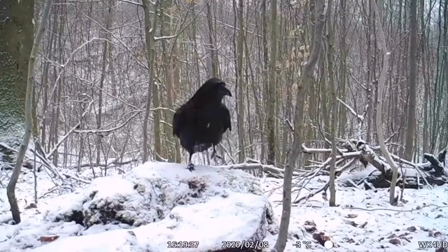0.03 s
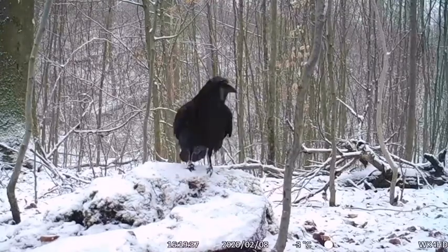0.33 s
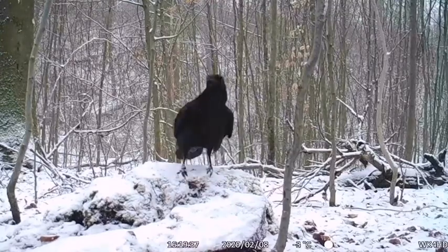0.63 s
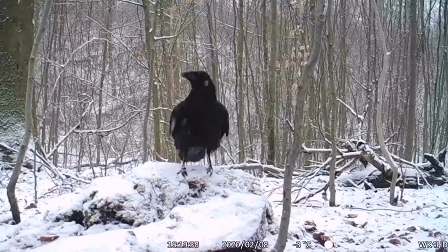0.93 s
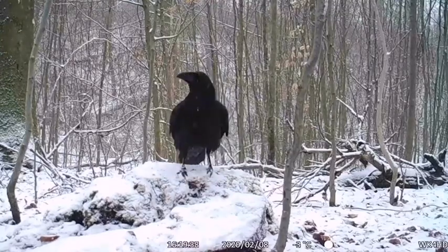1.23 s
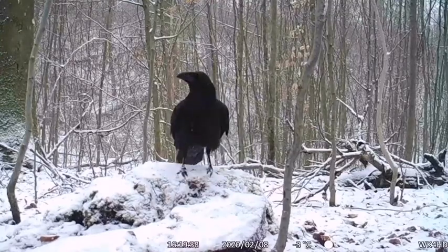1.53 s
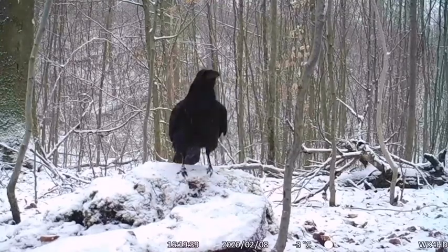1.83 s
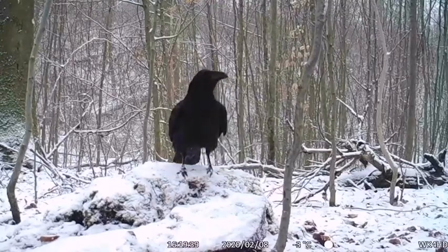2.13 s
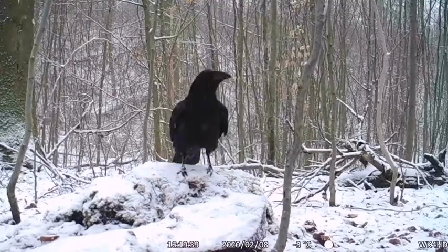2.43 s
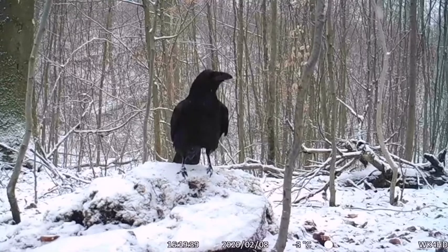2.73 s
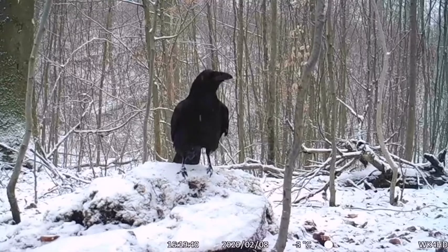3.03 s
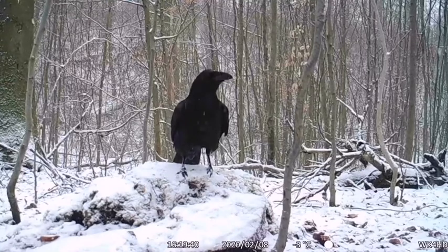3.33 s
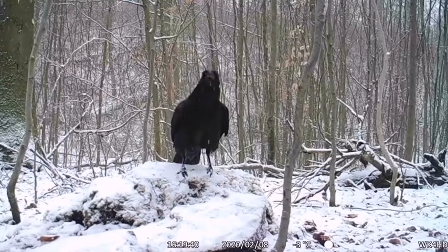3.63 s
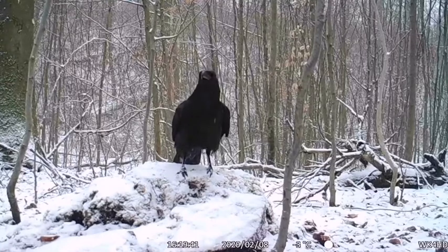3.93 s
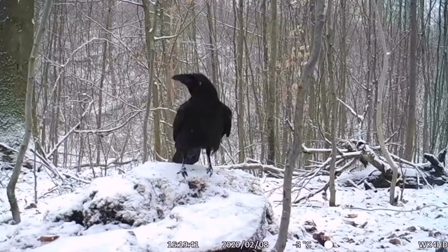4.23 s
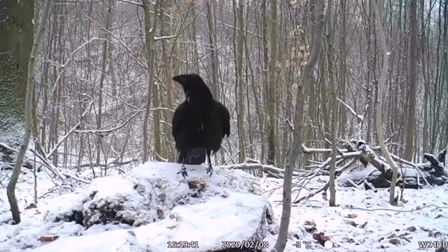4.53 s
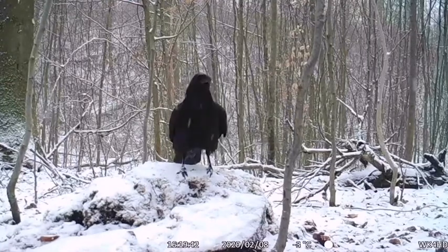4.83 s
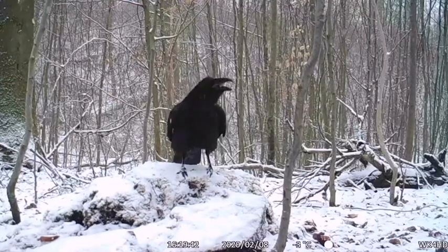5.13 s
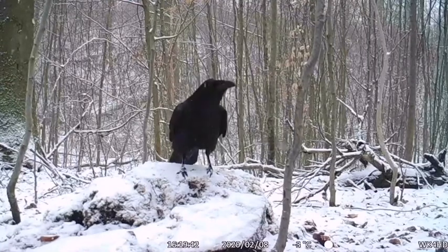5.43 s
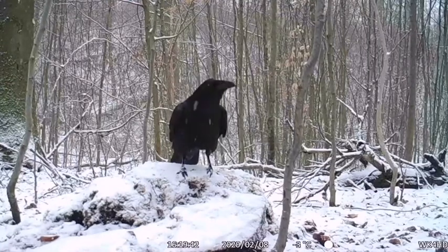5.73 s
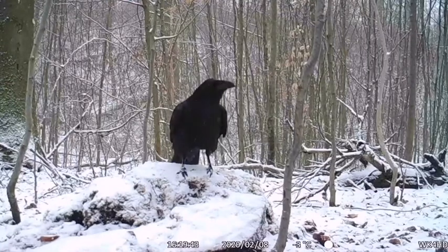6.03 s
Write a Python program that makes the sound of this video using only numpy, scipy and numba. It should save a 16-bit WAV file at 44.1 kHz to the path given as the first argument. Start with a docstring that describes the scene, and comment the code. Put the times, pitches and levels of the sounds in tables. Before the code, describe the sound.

One loud, hoarse raven croak breaks the stillness of a snowy forest near the end, after several seconds of only faint, steady rumble and hiss from far away. The call is brief and close, a throaty rattle that opens into a raspy note and drops, leaving a thin echo among the trees. The microphone has little treble and adds slight grit to the peaks.

```python
"""Raven croak in a snowy forest

One close, harsh croak: throbs of air drive the syrinx and ring throat and beak.
It starts as a rattle, swells into a rough arched note and falls.
Trunks scatter it back over a soft, distant rush.
A narrow-band microphone overloads on the loudest throbs."""
import sys
import numpy as np
from scipy import signal
from scipy.fft import rfft, irfft
from scipy.io import wavfile
from scipy.ndimage import uniform_filter1d
from numba import njit

SR = 44100
rng = np.random.default_rng(int(sys.argv[2]) if len(sys.argv) > 2 else 0)


def wav_out(sig):
    """Save sig, one row per channel (or a flat mono array), as 16-bit PCM at SR to the path in sys.argv[1]."""
    wavfile.write(sys.argv[1], SR, np.round(np.clip(np.atleast_2d(sig).T, -1, 1) * 32767).astype(np.int16))


N = 267687
TIME_S = np.arange(N) / SR
FIRST_THROB_S = 4.9847
MICROPHONE_HZ = 4077

# windpipe and throat resonances before tuning: centre_hz, width_hz, relative_db
THROAT_MODES = [(590, 250, -32), (1222, 205, 10.5), (1440, 150, -7.5), (1680, 90, -17.5)]
# open-beak resonances: centre_hz, width_hz, relative_db
BEAK_MODES = [(2300, 200, -24), (2764, 210, -0.5), (3010, 130, 2.5), (3684, 200, -3.5)]


def from_db(db):
    """Decibels to gain."""
    return 10 ** (np.asarray(db) / 20)


def unit_rms(x):
    """Scale to rms 1."""
    return x / np.sqrt(np.mean(x ** 2) + 1e-20)


def hold_rms(x, window_samples=353):
    """Hold the running rms at 1."""
    power = uniform_filter1d(uniform_filter1d(x ** 2, window_samples), window_samples)
    return x / np.sqrt(np.abs(power) + 1e-12)


def cut(x, hz, kind, order=2):
    """Butterworth low- or high-pass."""
    return signal.sosfilt(signal.butter(order, hz, kind, fs=SR, output="sos"), x)


def wander(rate_hz):
    """Smooth random drift, rms 1."""
    return unit_rms(cut(rng.standard_normal(N + SR), rate_hz, "low")[SR:])


def ramp(mid_s, width_s):
    """Smooth step from 0 to 1."""
    return .5 + .5 * np.tanh((TIME_S - mid_s) / (2 * width_s))


@njit
def ring(x, rad_per_sample, radius):
    """Two-pole resonance with a movable centre."""
    y = np.zeros(len(x))
    for i in range(2, len(x)):
        drive = (1 - radius ** 2) / 2 * (x[i] - x[i - 2])
        y[i] = drive + 2 * radius * np.cos(rad_per_sample[i]) * y[i - 1] - radius ** 2 * y[i - 2]
    return y


def resonate(x, modes, tuning=1):
    """Parallel resonances of alternating sign, centres scaled by tuning."""
    rad_per_hz = 2 * np.pi / SR * tuning * np.ones(N)
    return sum((-1) ** k * from_db(db) * ring(x, hz * rad_per_hz, np.exp(-np.pi * width_hz / SR))
               for k, (hz, width_hz, db) in enumerate(modes))


def distant_rush(level_db=-51.5, rise_db_per_s=.23, waver_db=.34, split_hz=600):
    """Far forest noise; rumble and hiss waver separately."""
    # noise spectrum: frequency_hz, relative_density_db
    rush_spectrum = [(20, 5), (55, -1.5), (80, -3.5), (160, -6.5), (255, -4), (320, -9.5), (600, -15),
                     (950, -9.5), (1300, -13.5), (1800, -23), (2500, -28), (3600, -30), (4400, -49.5)]
    hz, db = np.transpose(rush_spectrum)
    bins_hz = np.arange(N // 2 + 1) * SR / N
    shape = from_db(np.interp(np.log(bins_hz + 1), np.log(hz), db))
    noise = irfft(rfft(rng.standard_normal(N)) * shape, N)
    noise = unit_rms(cut(noise, 20, "high"))
    rumble = cut(noise, split_hz, "low", order=1)
    hiss = noise - rumble
    rush = rumble * from_db(waver_db * wander(1.7)) + hiss * from_db(waver_db * wander(3.9))
    return from_db(level_db + rise_db_per_s * TIME_S) * rush


def forest_echo(x, t60_s=1.15, build_s=.011, tail_db=-30.5, low_hz=1100, bark_hz=3200):
    """Near trunks give distinct echoes; far ones blur into a thin tail."""
    # near-trunk echoes: delay_s, level_db
    trunk_echoes = [(.037, -37.5), (.066, -30.5), (.083, -38)]
    envelope = from_db(-60 * TIME_S / t60_s) * (1 - np.exp(-TIME_S / build_s))
    scatter = rng.standard_normal(N) * envelope
    response = from_db(tail_db) * scatter / np.sqrt(np.sum(scatter ** 2))
    for delay_s, level_db in trunk_echoes:
        response[round(delay_s * SR)] += from_db(level_db)
    echo = signal.fftconvolve(x, response)[:N]
    # long waves bend around trunks; the shortest are lost in bark and snow
    return cut(cut(echo, low_hz, "high", order=1), bark_hz, "low", order=4)


def rattle_to_note(rattle, note):
    """Crossfade a setting as the throbs fuse into a note."""
    return rattle + (note - rattle) * ramp(mid_s=5.063, width_s=.004)


def throb_count(start_hz=83.9, slowing_hz_per_s=350):
    """Throbs elapsed; their rate falls linearly to zero."""
    age_s = np.clip(TIME_S - FIRST_THROB_S, 0, start_hz / slowing_hz_per_s)
    return start_hz * age_s - slowing_hz_per_s * age_s ** 2 / 2


def effort(hold_db=-6.5):
    """One push of air: swell, hold, collapse."""
    swell = ramp(mid_s=5.044, width_s=.014)
    release = 1 - ramp(mid_s=5.178, width_s=.0067)
    return from_db(hold_db) * (TIME_S > FIRST_THROB_S) * swell * release


def air_pressure(narrowness=3.5):
    """Effort with dips between throbs: deep in the rattle, shallow in the note."""
    closure = np.abs(np.cos(np.pi * throb_count())) ** narrowness
    dip_db = rattle_to_note(26, 7.5)
    return effort() * from_db(-dip_db * closure) + 1e-9


def syrinx(jitter=.035, shimmer_db=3.5, rasp=.75, bend_depth=.068, bend_lag_throbs=.18):
    """Uneven pulses with a turbulent puff per cycle; each throb bends the pitch up."""
    # arch of the note: time_s, pitch_hz
    pitch_arch = [(5.02, 290), (5.09, 364), (5.118, 410), (5.15, 405), (5.16, 333), (5.19, 228)]
    arch_hz = np.interp(TIME_S, *np.transpose(pitch_arch))
    hoarseness = rattle_to_note(.6, .5)
    bend = -bend_depth * np.cos(2 * np.pi * (throb_count() - bend_lag_throbs))
    pitch_hz = arch_hz * (1 + bend + jitter * hoarseness * wander(220))
    cycles = np.cumsum(pitch_hz) / SR
    pulses = unit_rms(sum(np.cos(2 * np.pi * k * cycles) for k in range(1, 19)))
    turbulence = cut(rng.standard_normal(N), 9000, "low")
    puffs = hoarseness * unit_rms(turbulence * (1 + np.cos(2 * np.pi * cycles)))
    shimmer = from_db(shimmer_db * hoarseness * wander(200))
    return pulses * shimmer + rasp * puffs, puffs, cycles


def chest(pressure, cycles, level_db=-22, knee_db=-21, waver_db=2.4, octave_db=-14, slip_cycles=.056):
    """The two lowest partials waver in level and phase and saturate early with pressure."""
    phase = 2 * np.pi * (cycles + slip_cycles * wander(170))
    partials = np.sin(phase) + from_db(octave_db + waver_db * wander(130)) * np.sin(2 * phase)
    saturation = pressure / (pressure + from_db(knee_db))
    return from_db(level_db + waver_db * wander(100)) * saturation * np.sqrt(2) * partials


def snaps(open_phase_throbs=.38, ring_db=9, crack_db=-5):
    """Membranes snap open once a throb; the crack also rings throat and beak."""
    opens = np.diff(np.floor(throb_count() - open_phase_throbs), prepend=-1) > 0
    strength = effort() ** 1.1 * from_db(rattle_to_note(-.5, -4))
    clicks = 1e-18 * rng.standard_normal(N) - opens * strength
    band_makeup = SR / (2 * MICROPHONE_HZ)
    crack = from_db(crack_db) * cut(clicks, 600, "high") * band_makeup
    return crack + from_db(ring_db) * (resonate(clicks, THROAT_MODES) + resonate(clicks, BEAK_MODES))


def raven(throat_db=1, beak_db=-5, beak_rasp=.92, cavity_hz=1640, cavity_width_hz=110):
    """Throbbing air sounds the syrinx through throat and beak; strong throbs are brighter."""
    pressure = air_pressure()
    source, puffs, cycles = syrinx()
    # each throb stretches the throat and lifts its resonances
    tuning = .91 + .14 * pressure / pressure.max()
    throat = resonate(source, THROAT_MODES, tuning)
    throat = hold_rms(cut(cut(throat, 850, "high"), 1850, "low", order=4))
    beak = resonate(source + beak_rasp * puffs, BEAK_MODES)
    beak = hold_rms(cut(beak, 2200, "high"))
    voice = from_db(throat_db) * pressure * throat + from_db(beak_db) * pressure ** 1.4 * beak + snaps()
    # a side cavity of the mouth absorbs one narrow band
    notch = signal.iirnotch(cavity_hz, cavity_hz / cavity_width_hz, SR)
    return signal.lfilter(*notch, voice) + chest(pressure, cycles)


def scene():
    """Croak, echo and rush, alike in both channels."""
    croak = raven()
    return np.tile(croak + forest_echo(croak) + distant_rush(), (2, 1))


def record(dry, overload=.74, sizzle_knee=.33, sizzle_db=-23.5, sizzle_hz=8200, cutoff_hz=12900):
    """The microphone flattens peaks and narrows the band; faint sizzle rides the highest crests."""
    clipped = dry / (1 + (dry / overload) ** 6) ** (1 / 6)
    narrow = signal.sosfiltfilt(signal.cheby1(7, .05, MICROPHONE_HZ, fs=SR, output="sos"), clipped)
    crests = np.maximum(np.abs(clipped) / overload - sizzle_knee, 0)
    grit = unit_rms(rng.standard_normal(N) + rng.standard_normal((2, N))) * crests
    sizzle = from_db(sizzle_db) * cut(cut(grit, MICROPHONE_HZ, "high", order=4), sizzle_hz, "low")
    return signal.sosfilt(signal.ellip(10, .1, 80, cutoff_hz, fs=SR, output="sos"), narrow + sizzle)


dry = scene()
out = record(dry)
wav_out(out)
```